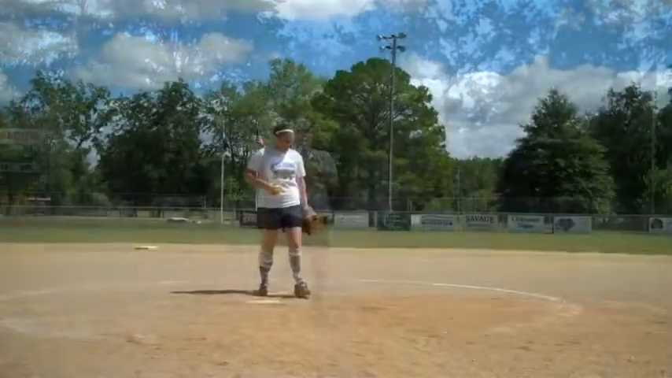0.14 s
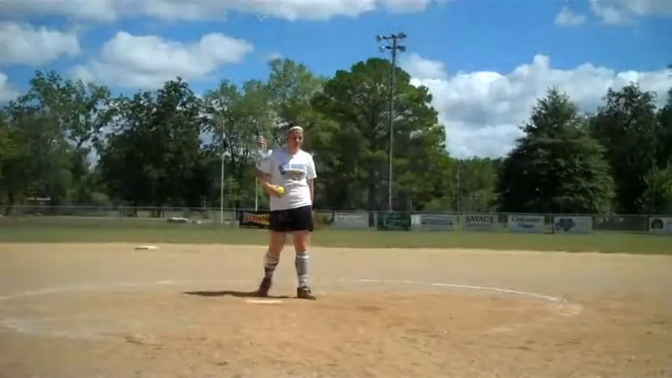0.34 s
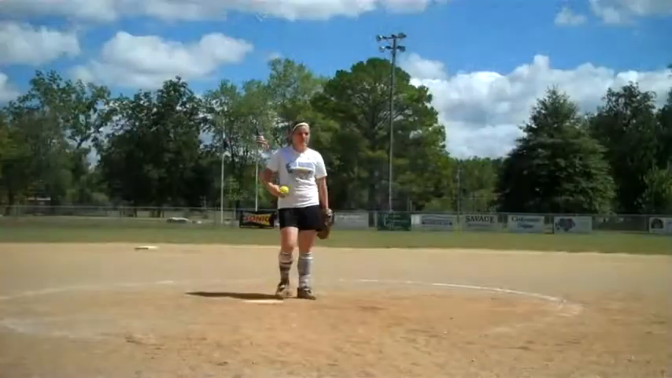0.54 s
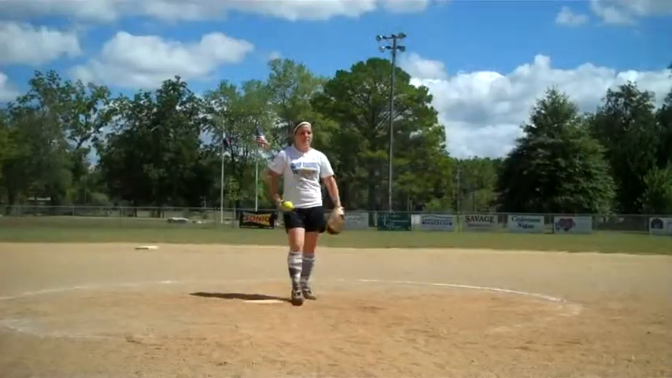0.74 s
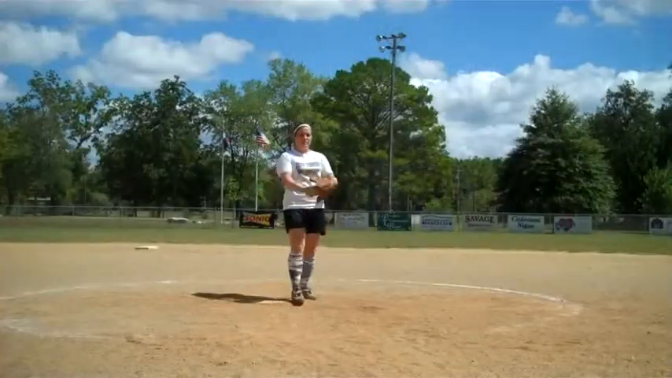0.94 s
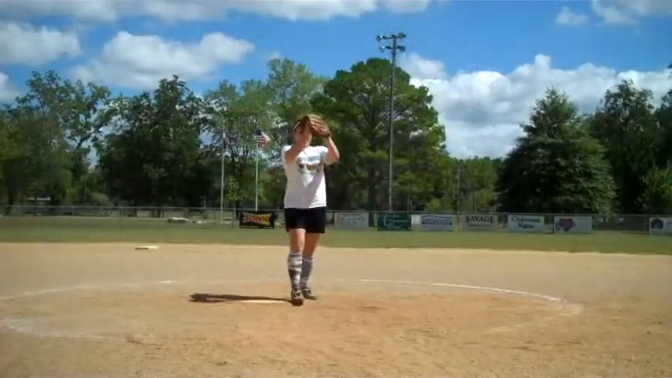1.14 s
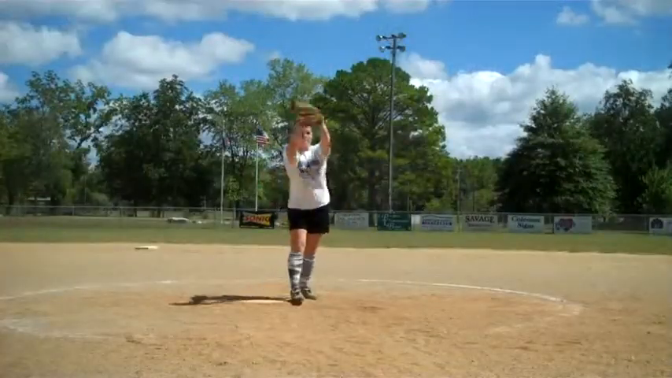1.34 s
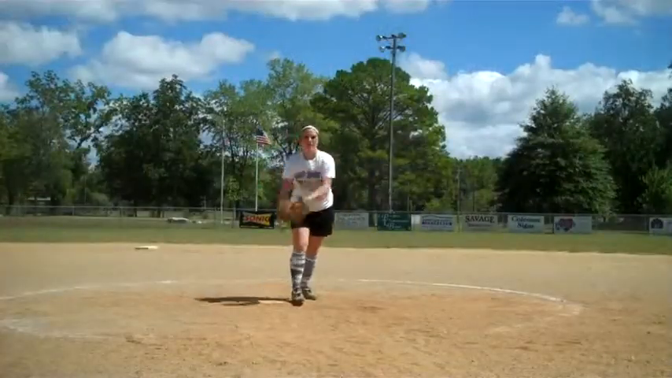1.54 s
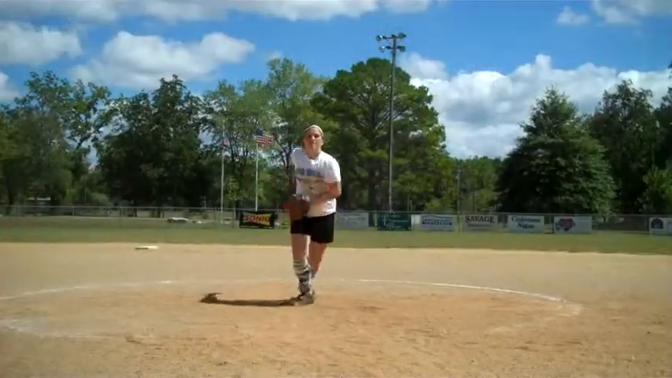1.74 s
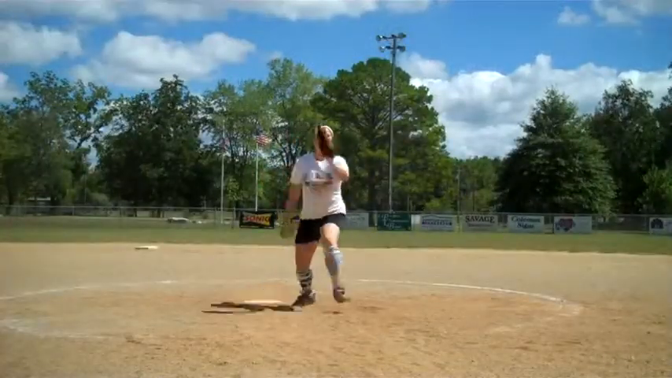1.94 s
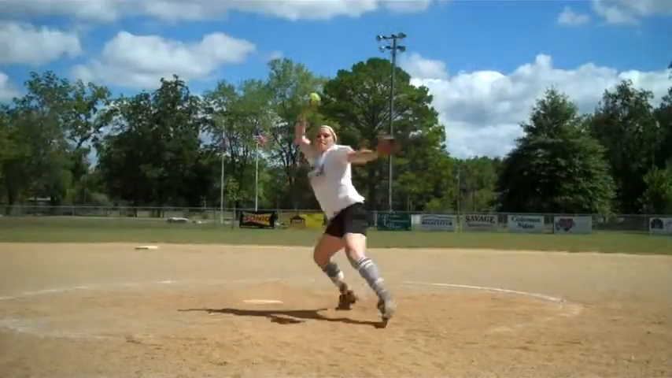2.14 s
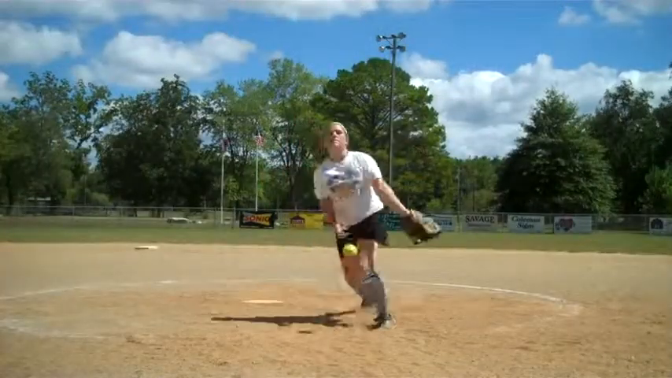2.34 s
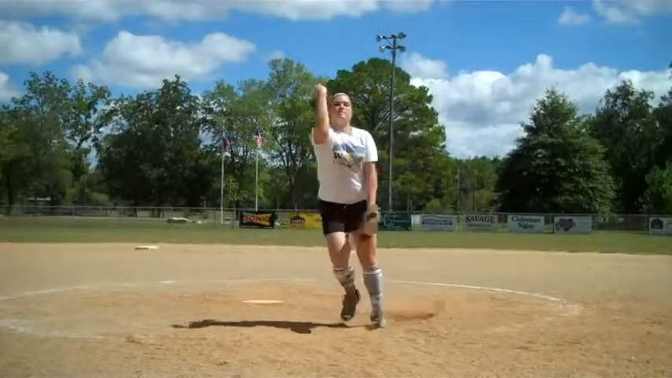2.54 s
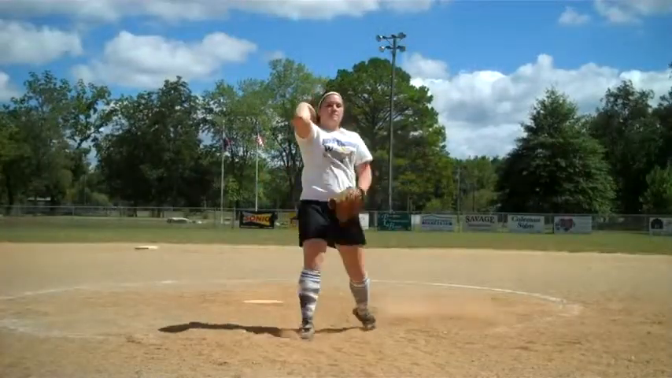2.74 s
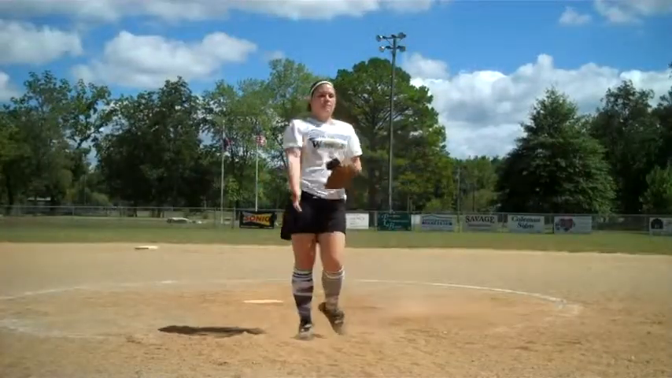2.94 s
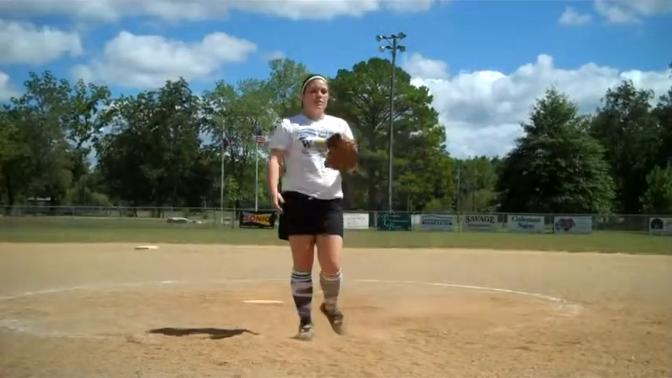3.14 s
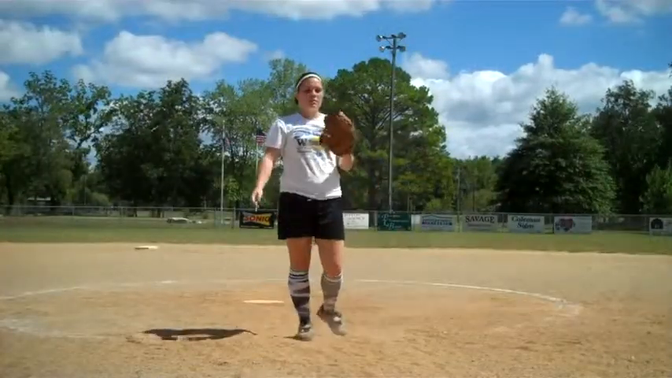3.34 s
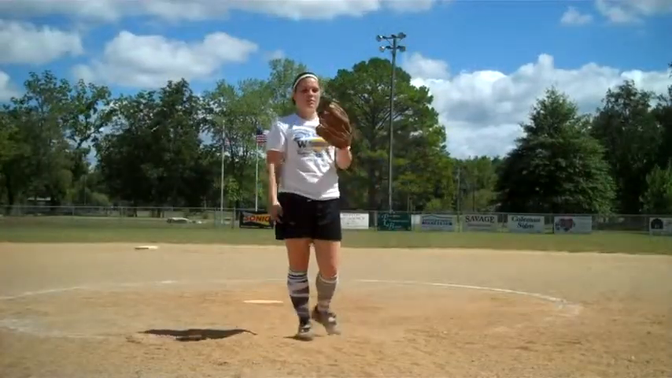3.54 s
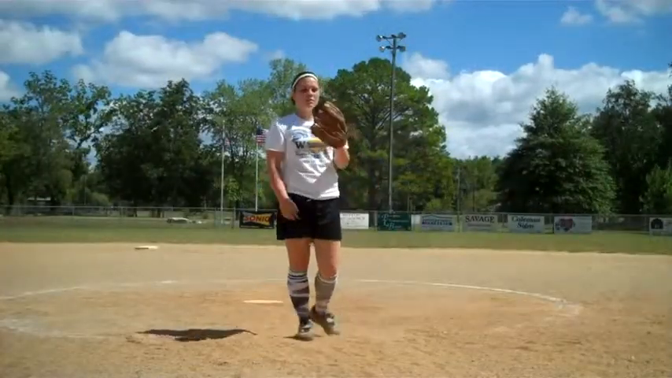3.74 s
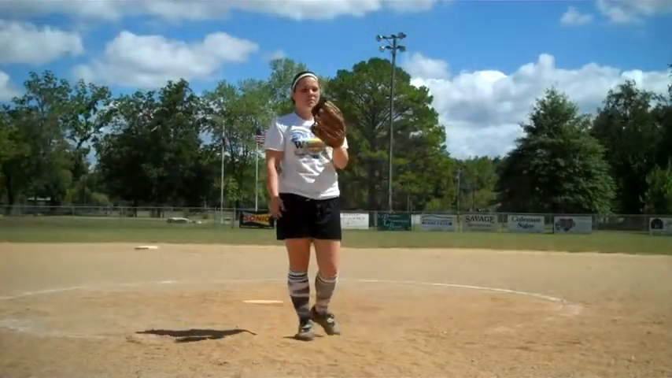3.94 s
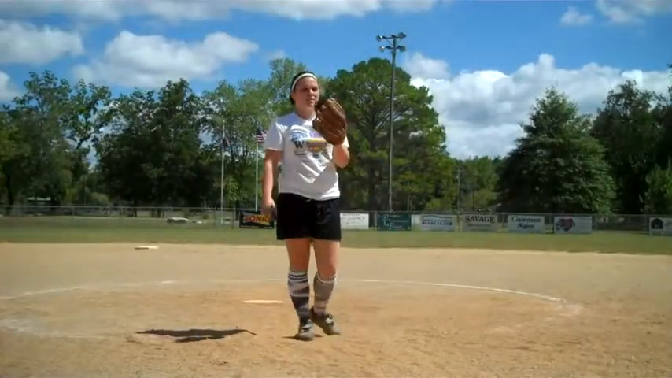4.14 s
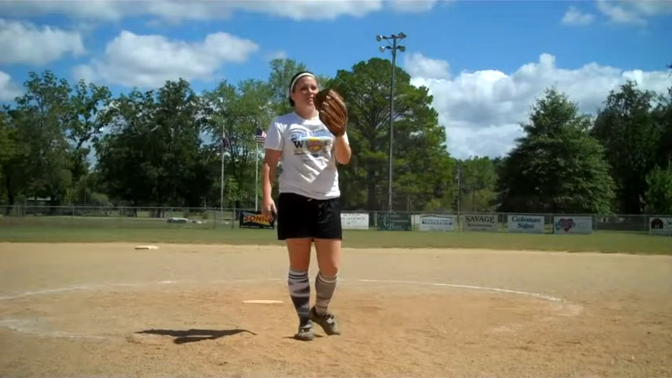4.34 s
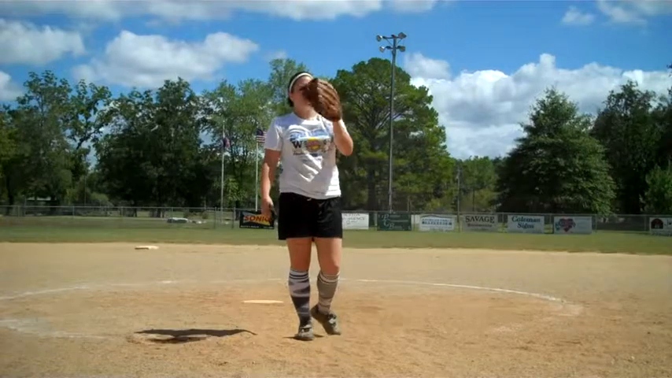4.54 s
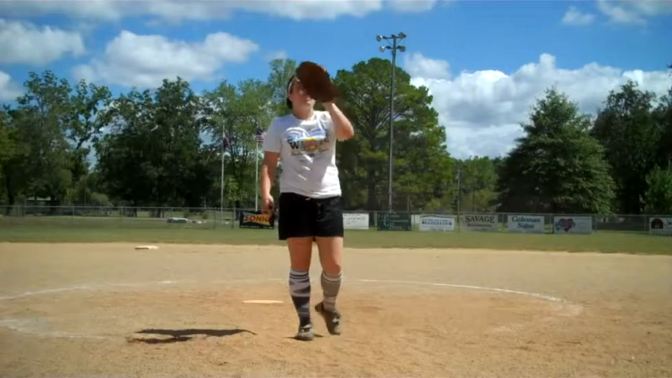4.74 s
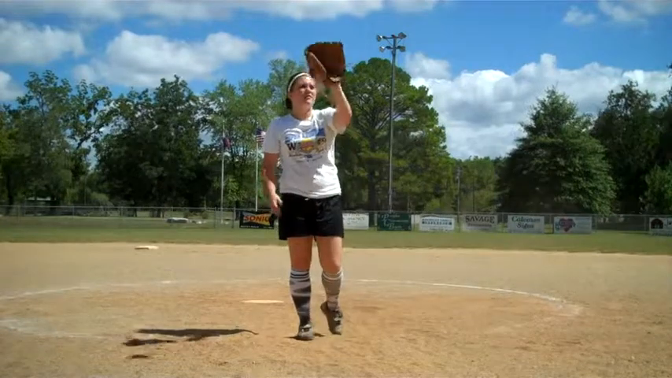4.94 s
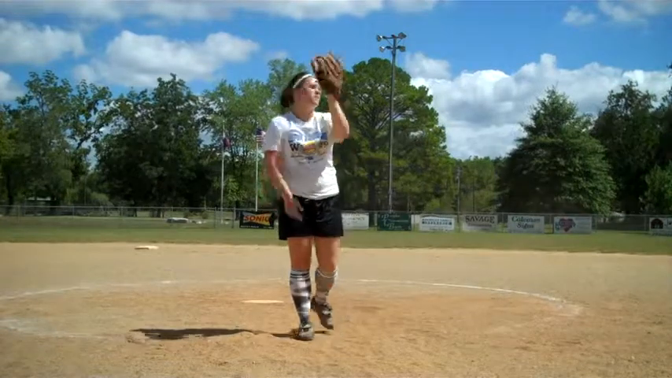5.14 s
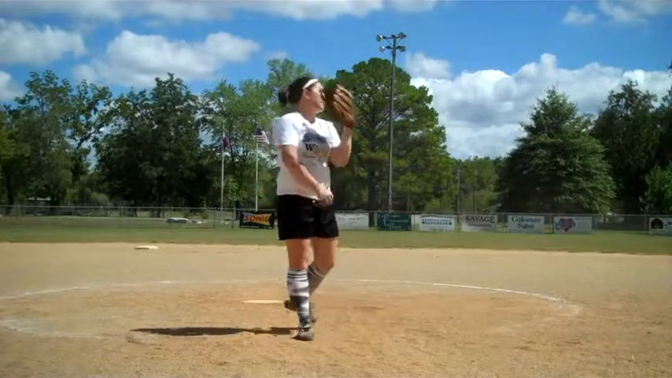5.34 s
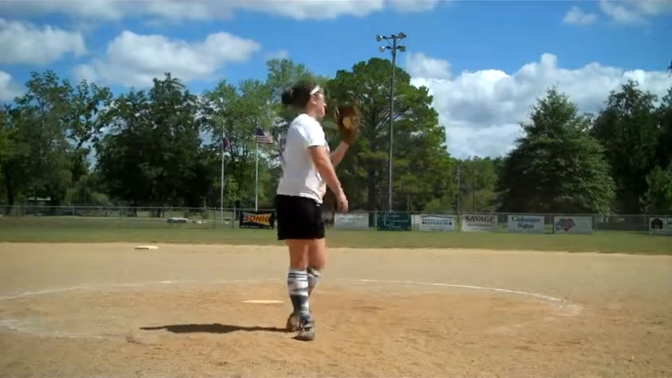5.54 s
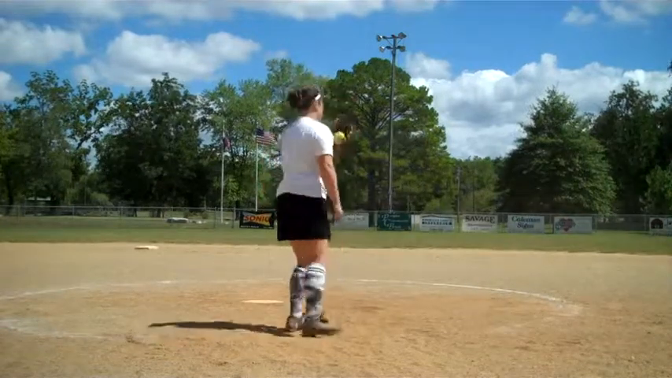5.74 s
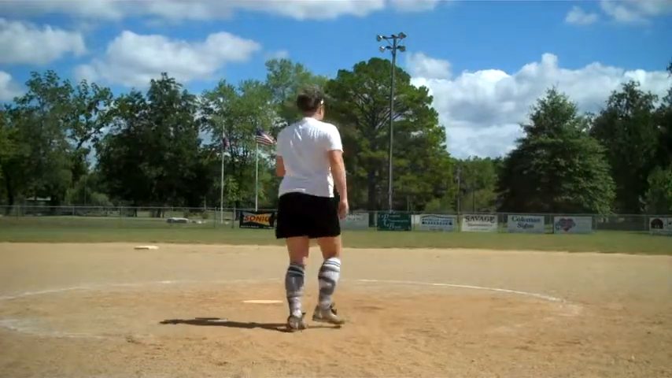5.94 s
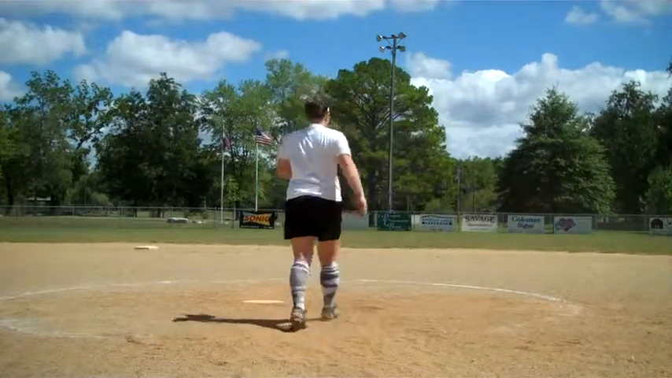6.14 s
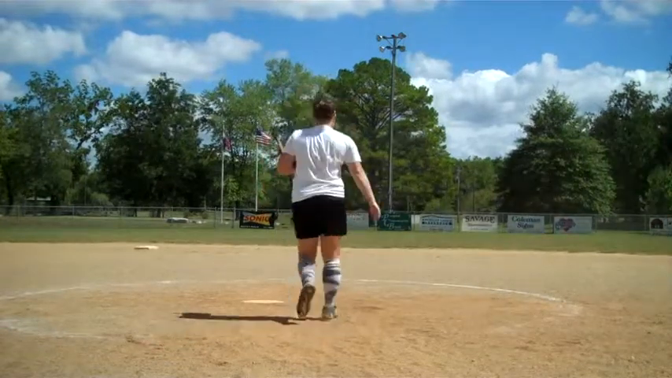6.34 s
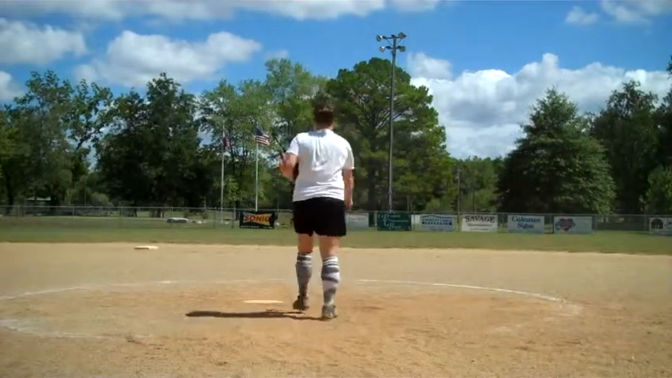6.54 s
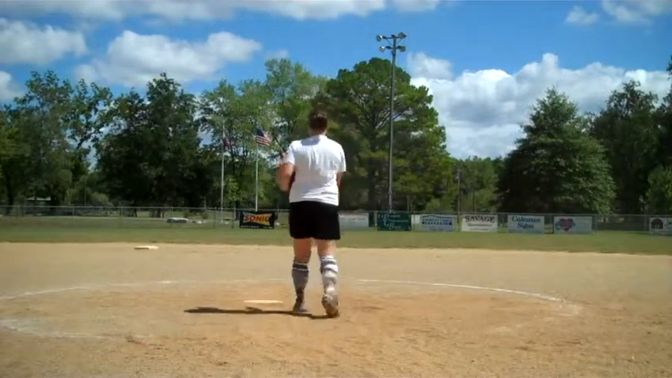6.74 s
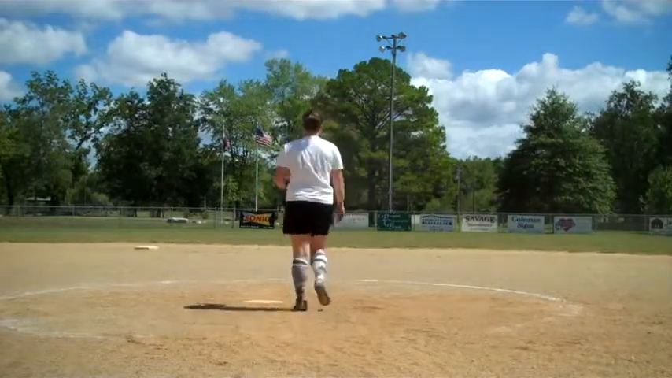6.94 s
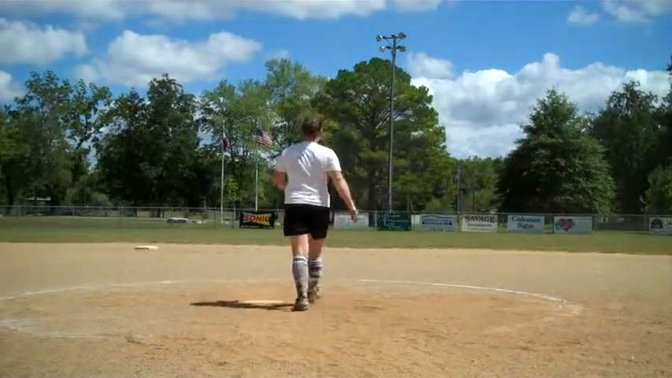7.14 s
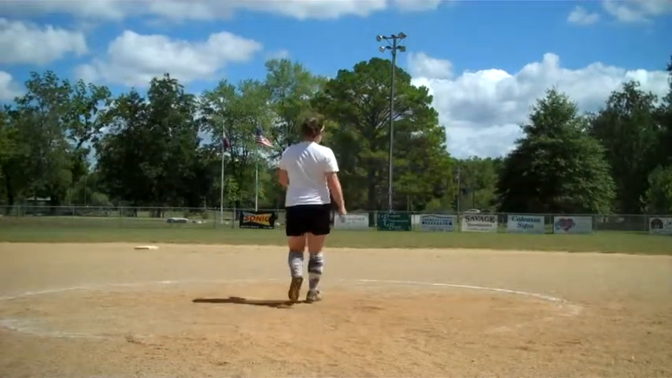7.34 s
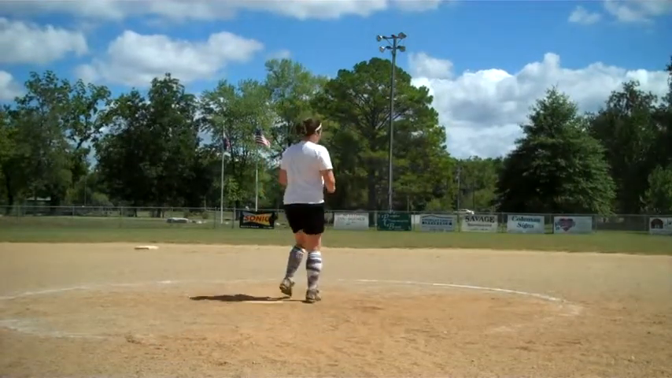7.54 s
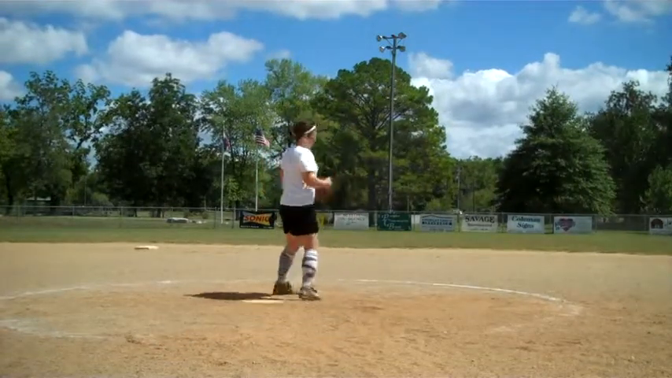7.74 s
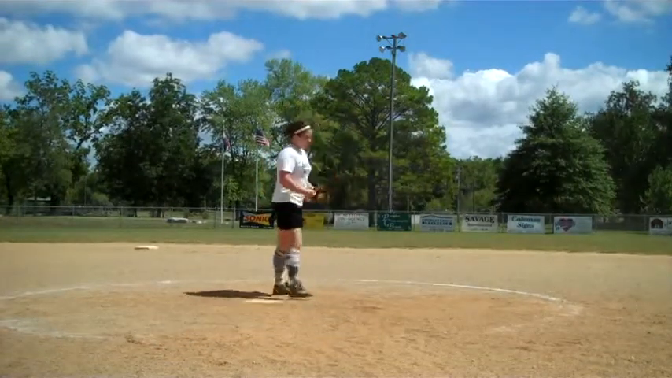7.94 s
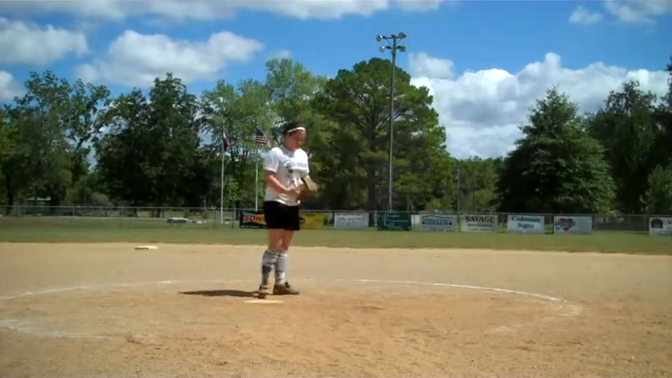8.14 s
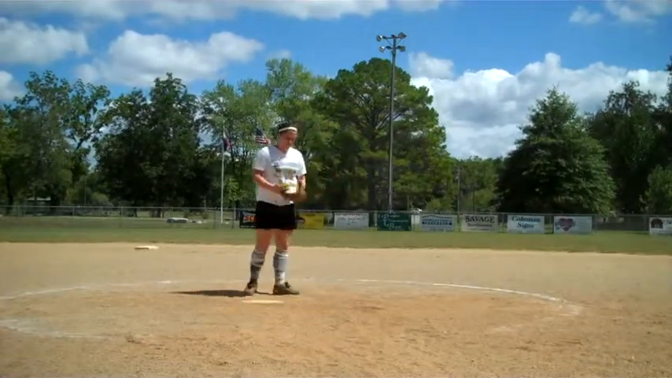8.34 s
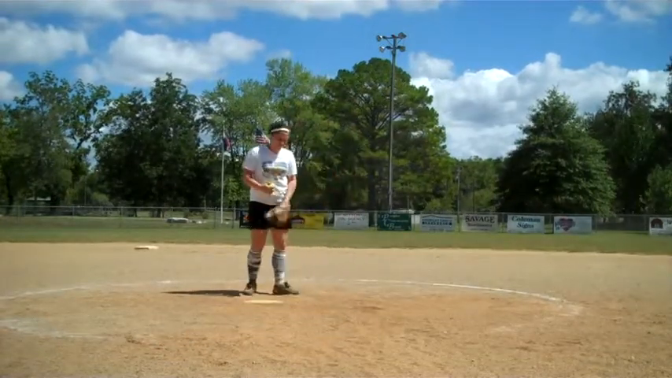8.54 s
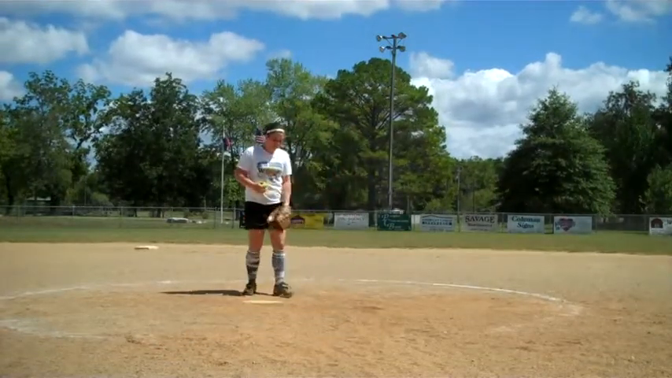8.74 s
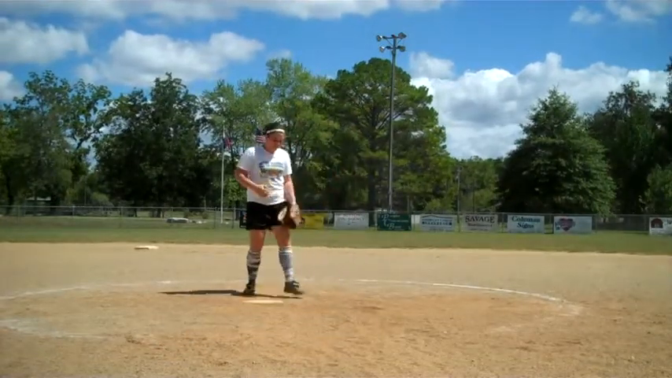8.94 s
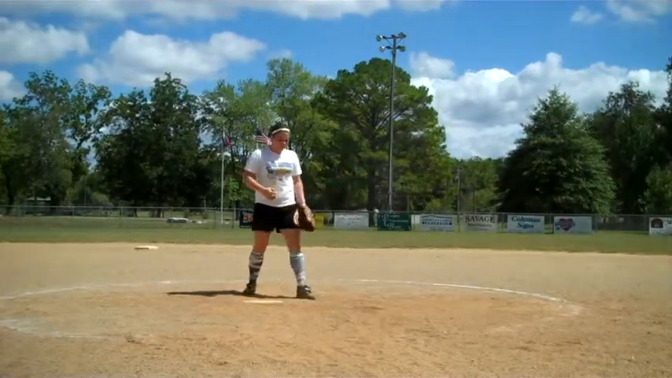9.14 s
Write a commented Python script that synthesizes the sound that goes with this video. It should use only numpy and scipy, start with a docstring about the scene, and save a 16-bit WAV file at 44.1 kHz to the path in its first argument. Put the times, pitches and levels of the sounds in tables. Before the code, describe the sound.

Quiet field ambience, shoes dragging across dirt, one violent leather mitt smack, soft wind thumps, then a smaller crackling glove catch farther away.

```python
"""Softball pitch and return throw

Two spaced microphone ports beside a dirt field. Leaves and distance hiss, a low drone fades, wind thumps on each port:
shaped noise and damped eddies. Small ticks, squeaks, a clink and a rasp are sines and filtered slips. Shoes scuff
with noise strokes; the pitch pops into a mitt close by on the right, a sinking sine with leather cracks and echoes
that overloads the input; the return throw rattles into a far glove as noise bursts."""
import sys
import numpy as np
from scipy.fft import rfft, irfft, next_fast_len
from scipy.io import wavfile
from scipy.ndimage import map_coordinates

SR = 44100
rng = np.random.default_rng(int(sys.argv[2]) if len(sys.argv) > 2 else 0)


def pcm_store(signal):
    """Save signal as 16-bit PCM."""
    levels = np.round(np.clip(np.atleast_2d(signal), -1, 1) * 32767)
    wavfile.write(sys.argv[1], SR, levels.astype(np.int16).T)


N = 409997
TIME = np.arange(N) / SR


def amp(db):
    """Gain of a dB value."""
    return 10 ** (np.asarray(db) / 20)


def unit(x):
    """x at rms 1."""
    return x / np.sqrt(np.mean(x ** 2) + 1e-20)


def along(points, hz):
    """Interpolates (f/Hz, value) points on a log frequency axis."""
    f, v = np.transpose(points)
    return np.interp(np.log(hz + 1), np.log(f + 1), v)


def curves(rows):
    """One value per sample for each column after the time."""
    s, *cols = np.transpose(rows)
    return [np.interp(TIME, s, c) for c in cols]


def wobble(knots_per_s):
    """A smooth random curve."""
    knots = rng.standard_normal(int(N * knots_per_s / SR) + 4)
    return map_coordinates(knots, [TIME * knots_per_s])


def sine(hz, t):
    """Sine of constant pitch."""
    return np.sin(2 * np.pi * hz * t)


def attack(t, rise_s):
    """Exponential onset from 0 towards 1."""
    return 1 - np.exp(-t / rise_s)


def stroke(peak_s, rise_s, fall_s):
    """Pressure that swells to 1 at its peak and eases off."""
    width_s = np.where(TIME < peak_s, rise_s, fall_s)
    return np.exp(-((TIME - peak_s) / width_s) ** 2)


def filtered(x, response):
    """x times a complex response of frequency."""
    m = next_fast_len(x.shape[-1] + 8192)
    hz = np.fft.rfftfreq(m, 1 / SR)
    return irfft(rfft(x, m) * response(hz), m)[..., :x.shape[-1]]


def noise(spectrum, size=N):
    """Coloured noise of rms 1."""
    white = rng.standard_normal(size)
    return unit(filtered(white, lambda hz: amp(along(spectrum, hz))))


# likeness of far sound at the two ports: f/Hz, correlation/1
FAR_LIKENESS = [(200, 1), (700, 0.92), (1300, 0.7), (2400, 0.31), (4000, -0.3)]


def spread(spectrum, likeness=FAR_LIKENESS):
    """Far noise at both ports, rms 1: the mid/side balance sets their correlation at each frequency."""
    def mid_side(hz):
        angle = np.arccos(np.clip(along(likeness, hz), -1, 1)) / 2
        return amp(along(spectrum, hz)) * [np.cos(angle), np.sin(angle)]
    mid, side = filtered(rng.standard_normal((2, N)), mid_side)
    return unit(np.array([mid + side, mid - side]))


def add(track, s, sound):
    """Lays a sound into a track at s seconds."""
    start = round(s * SR)
    track[..., start:start + sound.shape[-1]] += sound


def placed(x, lead_ms, loose):
    """A source that reaches the right port first; part of its treble differs between the ports."""
    def ports(hz):
        delay = np.exp(1j * np.pi * hz * lead_ms / 1000 * np.array([[-1], [1]]))
        differing = 1j * np.array([[1], [-1]]) * np.sin(hz / 310) * hz / (hz + 4000)
        return delay * (1 + loose * differing)
    return filtered(x, ports)


# far rush and leaf hiss: t/s, rush level/dB, hiss level/dB
FIELD_DB = [(0, -47, -48.5), (.36, -43.5, -48.5), (2.1, -43.5, -48.5), (2.55, -43.5, -45.5),
            (3, -44, -48.5), (4.9, -44.5, -50), (6.2, -44.5, -49.5), (6.8, -45.5, -50.5),
            (8.2, -45.5, -49.5), (9.3, -45.5, -49.5)]
# spectra: f/Hz, level/dB per Hz
RUSH_SPECTRUM_DB = [(88, -32), (150, -9), (195, -3.5), (233, -5.5), (262, -6), (389, -6), (605, -7.5),
                    (1070, -2.5), (1260, -4.5), (3040, -8), (5000, -15), (6500, -24.5), (11000, -120)]
HISS_SPECTRUM_DB = [(2500, -40), (4000, -6.5), (5500, -2.5), (7300, 2), (8500, -6), (10000, -17.5),
                    (12000, -22.5), (14100, -20), (14300, -68)]
DRONE_SPECTRUM_DB = [(50, -19), (85, 6), (105, 2), (122, 13), (145, -3), (200, -21), (260, -54)]
# leaf hiss at the two ports: f/Hz, correlation/1
LEAVES_LIKENESS = [(3000, 0.37), (6000, 0.26), (9000, 0.13), (12000, 0.081)]
# drone: t/s, level/dB
DRONE_DB = [(0, -58.5), (2, -58), (3, -63.5), (6, -65.5), (9.3, -62.5)]


def field():
    """Trees and distance: coloured noises with slow random swells, the leaves mostly from the right."""
    rush_db, hiss_db = curves(FIELD_DB)
    drone_db, = curves(DRONE_DB)
    rush = amp(rush_db + 0.52 * wobble(8)) * spread(RUSH_SPECTRUM_DB)
    leaves = placed(spread(HISS_SPECTRUM_DB, LEAVES_LIKENESS), lead_ms=0.099, loose=0)
    hiss = amp(hiss_db + 0.7 * wobble(9)) * leaves
    drone = amp(drone_db + 0.63 * wobble(3.7)) * spread(DRONE_SPECTRUM_DB)
    return rush + hiss + drone


# buffeting: t/s, level/dB
WIND_DB = [(0, -63), (2.1, -63), (2.45, -50.5), (2.8, -64.5), (3.2, -50.5), (3.5, -61), (4, -54.5),
           (4.9, -49.5), (5.3, -45.5), (5.7, -55), (6.4, -59), (6.7, -65.5), (9.3, -64)]
# buffeting spectrum: f/Hz, level/dB per Hz
BUFFET_SPECTRUM_DB = [(15, -30), (40, 0), (90, -0.5), (170, -9.5), (300, -17), (600, -52)]
# wind blows: t/s, level/dB, f/Hz, left minus right/dB
THUMPS = [(3.468, -39, 94, -8), (3.939, -39.5, 67, -16), (4.129, -41, 83, 11), (4.459, -37.5, 52, -14),
          (4.669, -33.5, 94, -21), (4.73, -40, 120, -17.5), (4.965, -37, 71, 24), (5.013, -32.5, 160, 21),
          (5.128, -33, 65, -5), (5.249, -36, 97, 7), (5.49, -38, 171, -8), (5.568, -38, 70, -12)]


def wind():
    """Turbulence at the ports: independent low noise on each, plus short damped eddies."""
    wind_db, = curves(WIND_DB)
    out = np.array([amp(wind_db + 3.7 * wobble(20)) * noise(BUFFET_SPECTRUM_DB) for port in range(2)])
    t = TIME[:SR // 5]
    for s, db, hz, pan_db in THUMPS:
        phase = rng.uniform(0, 2 * np.pi, (2, 1))  # an eddy pushes each port on its own
        puff = t / 0.0073 * np.exp(1 - t / 0.0056) * np.sin(2 * np.pi * hz * t + phase)
        port_db = db + np.array([[pan_db], [-pan_db]]) / 2
        add(out, s - .002, amp(port_db) * puff)
    return out


# small dry ticks: t/s, level/dB (before a gain of 2), f/Hz
TICKS = [(0.591, -33, 4650), (1.7394, -32.5, 6650), (1.766, -38, 7100), (3.86, -37, 7070),
         (4.048, -36, 4950), (8.5503, -30, 7460)]


def ticks():
    """Small dry knocks: sines that die within milliseconds."""
    out, t = np.zeros(N), TIME[:SR // 4]
    for s, db, hz in TICKS:
        add(out, s, amp(db - 60 * t / 0.0033) * 2 * attack(t, 0.000082) * sine(hz, t))
    return out


# t/s, level/dB, first f/Hz, last f/Hz, length/s
SQUEAKS = [(1.862, -34.5, 5200, 8040, 0.008), (6.141, -46, 3440, 5400, 0.0094)]


def squeaks():
    """Rising sine glides of rough loudness, with a weaker partial below."""
    out, t = np.zeros(N), TIME[:SR // 4]
    for s, db, first_hz, last_hz, length_s in SQUEAKS:
        u = np.clip(t / length_s, 0, 1)
        cycles = np.cumsum(first_hz + (last_hz - first_hz) * u) / SR
        tone = sine(1, cycles) + 0.42 * sine(0.577, cycles)
        rough = amp(4 * wobble(1200)[:len(t)])
        add(out, s, amp(db) * np.sin(np.pi * u) ** 0.25 * rough * tone)
    return out


# modes of a small metal part: f/Hz, level/dB (before the clink's gain), t60/s
CLINK_MODES = [(3000, -11, 0.22), (4630, 2, .09), (4820, -12, .25), (6800, -8, .25), (6790, -16, .15),
               (9600, -12, 0.05)]


def clink():
    """A small metal part: decaying modes over a brief knock."""
    out, t = np.zeros(N), TIME[:SR // 4]
    ring = sum(amp(db - 60 * t / t60_s) * sine(hz, t) for hz, db, t60_s in CLINK_MODES)
    knock = 1.7 * sine(4900, t) + 0.75 * sine(5600, t) + 0.55 * sine(3100, t)
    knock *= np.sin(np.pi * np.clip(t / 0.0044, 0, 1))
    add(out, 6.556, amp(-36.5) * (ring * attack(t, .002) + knock))
    return out


# two pulls: peak t/s, level/dB (before SLIP_GAIN_DB), rise/s, fall/s
RASP_PULLS = [(7.963, -39, .024, .006), (7.974, -39, .005, .006)]
# resonances the slips ring: f/Hz, width/Hz, level/dB
RUBBER_MODES = [(1300, 1900, 1), (4320, 2000, 2.5), (7000, 1600, 5)]
SLIP_GAIN_DB = 21
BASE_SLIPS_PER_S, PULL_SLIPS_PER_S, PULL_EXPONENT = 300, 950, 0.22


def rasp():
    """Stick-slip: uneven impulses, denser under pressure, ring a resonant body."""
    def body(hz):
        modes = sum((-1) ** k * amp(db) * 1j * hz * width / (f * f - hz * hz + 1j * hz * width)
                    for k, (f, width, db) in enumerate(RUBBER_MODES))
        return modes / (1 + (hz / 9500) ** 8)
    pull = sum(amp(db) * stroke(s, rise_s, fall_s) for s, db, rise_s, fall_s in RASP_PULLS)
    rate = PULL_SLIPS_PER_S * (pull / pull.max()) ** PULL_EXPONENT + BASE_SLIPS_PER_S
    count = np.floor(np.cumsum(rate * (1 + 0.25 * wobble(400))) / SR)
    slips = np.diff(count, prepend=0) * amp(1.3 * rng.standard_normal(N))
    return pull * filtered(slips, body) * amp(SLIP_GAIN_DB)


# shoe strokes: peak t/s, level/dB, rise/s, fall/s, grit over sole/dB
SCUFFS = [(2.225, -40, 0.011, .012, -7), (2.252, -30, .014, .022, -11), (2.287, -26, 0.016, 0.019, -12.5),
          (2.312, -32, .012, .016, -13), (2.345, -32, 0.018, .014, -12), (2.48, -45, 0.068, 0.025, -4),
          (2.787, -46, .008, 0.021, 3), (2.828, -35.5, 0.014, 0.021, -7.5),
          (2.938, -38.5, .015, 0.025, -17), (3.003, -46, .02, .006, -1), (6.835, -42, 0.022, 0.013, -6),
          (7.76, -47.5, .04, 0.039, -5), (7.85, -55, .03, .04, -12)]
# spectra: f/Hz, level/dB per Hz
SOLE_SPECTRUM_DB = [(88, -52), (150, -16), (305, -5.5), (345, -7), (391, -4), (640, -3.5), (1100, -1),
                    (1470, -8), (2610, -8.5), (6000, -26), (7800, -55), (13200, -120)]
GRIT_SPECTRUM_DB = [(1200, -41), (2500, -8), (4000, -3.5), (5500, -7), (7300, 4), (9000, -11), (13000, -33),
                    (14300, -60)]
# t/s, level/dB, pebble over sole/dB, pebble f/Hz
CRUNCHES = [(2.2488, -30, 2, 7500), (2.278, -28, 2.5, 3220), (2.285, -26, -10, 7000),
            (2.292, -26, -1, 4000), (2.347, -36, -3, 3500), (2.792, -36, 6, 3500), (2.825, -34, -6, 2500),
            (2.921, -32, -6, 2500), (2.932, -29.5, 5, 3200), (2.975, -36, 6, 2800), (6.842, -39, 0, 4000)]
CRUNCH_T60_S = 0.0097


def shoes():
    """Soles drag over dirt: a dull scrape, clumped grit, and single crunches."""
    clumps = amp(1.9 * wobble(300))
    grains = unit(rng.standard_normal(N) * amp(2.3 * wobble(1500)))
    sole = unit(clumps * noise(SOLE_SPECTRUM_DB))
    grit = unit(clumps * filtered(grains, lambda hz: amp(along(GRIT_SPECTRUM_DB, hz))))
    out, t = np.zeros(N), TIME[:SR // 20]
    for s, db, rise_s, fall_s, grit_db in SCUFFS:
        out += amp(db) * stroke(s, rise_s, fall_s) * (sole + amp(grit_db) * grit)
    for s, db, pebble_db, hz in CRUNCHES:
        pebble = noise([(hz / 3.0, -25), (hz, 0), (hz * 1.46, -25), (hz * 3, -60)], size=len(t))
        burst = noise(SOLE_SPECTRUM_DB, size=len(t)) + amp(pebble_db) * pebble
        add(out, s, amp(db - 60 * t / CRUNCH_T60_S) * attack(t, 0.00022) * burst)
    return out


# mitt pocket: t/s, level/dB, first f/Hz, last f/Hz, glide/s, peak after t/s, swell/s
POCKET = (3.0263, 3.5, 800, 330, .0035, .0026, .0011)
# leather cracks: t/s, level/dB, t60/s
CRACKS = [(3.0262, -15, .015), (3.0280, 4, .0055), (3.0318, -25, .012)]
# crack spectrum: f/Hz, level/dB per Hz
LEATHER_SPECTRUM_DB = [(600, -3), (1600, 5), (2500, 4.5), (3600, 3.5), (5300, 0), (7400, -2), (9000, -2),
                       (11000, -30), (16000, -50)]


def mitt_impact():
    """The ball drives the pocket shut: a swelling pop that sinks in pitch, and leather cracks."""
    s, db, first_hz, last_hz, glide_s, peak_s, swell_s = POCKET
    out, t = np.zeros(N), TIME[:SR // 10]
    cycles = last_hz * t + (first_hz - last_hz) * glide_s * attack(t, glide_s)
    force = np.exp(-((t - peak_s) / swell_s) ** 2)
    force += .3 * (t / .002) ** 2 * np.exp(-t / .0017) + .03 * np.exp(-t / .01)
    add(out, s, -amp(db) * force * sine(1, cycles))
    # the stopped ball pushes a puff of air
    add(out, s, -amp(-12.5) * np.exp(-((t - .0035) / 0.00087) ** 2))
    for start_s, crack_db, t60_s in CRACKS:
        crack = attack(t, .0001) * noise(LEATHER_SPECTRUM_DB, size=len(t))
        add(out, start_s, amp(crack_db - 60 * t / t60_s) * crack)
    return out


# fence and stands: delay/s, level/dB, band centre f/Hz
ECHOES = [(0.013, -28, 700), (.029, -29, 5000), (0.061, -35, 1200), (.1165, -28, 3500), (.157, -31, 9000)]
ECHO_SMEAR_T60_S = 0.013


def mitt_echoes(impact):
    """Fence and stands return delayed bands; uneven surfaces smear them by scrambling phase."""
    t = TIME[:SR // 10]
    rough = rng.standard_normal(len(t)) * amp(-60 * t / ECHO_SMEAR_T60_S)

    def response(hz):
        echoes = 0
        for delay_s, db, centre_hz in ECHOES:
            band = 2 * (hz / centre_hz + 0.072) / (1 + (hz / centre_hz) ** 2)
            echoes = echoes + amp(db) * np.exp(-2j * np.pi * hz * delay_s) * band
        return echoes * np.exp(1j * np.angle(rfft(rough, 2 * len(hz) - 1)))
    return filtered(impact, response)


# field scatter spectrum: f/Hz, level/dB per Hz
SCATTER_SPECTRUM_DB = [(150, -32), (350, 5), (600, 3), (1100, 1), (2000, -7), (5000, -29), (9000, -39)]


def mitt_scatter():
    """Diffuse noise tail of the pop: near ground first, then the fence."""
    out, t = np.zeros((2, N)), TIME[:SR // 3]
    ground = amp(-60 * t / 0.061)
    fence = 0.2 * np.exp(-((t - .08) / 0.044) ** 2)
    tail = spread(SCATTER_SPECTRUM_DB)[:, :len(t)] * amp(-28.0) * (ground + fence)
    add(out, POCKET[0] + 0.00446, tail)
    return out


def mitt():
    """The pop at both ports, direct from the right, with its echoes and scatter."""
    impact = mitt_impact()
    direct = placed(impact, lead_ms=0.171, loose=0.99)
    echoes = placed(mitt_echoes(impact), lead_ms=0.018, loose=0.44)
    return direct + echoes + mitt_scatter()


# touches in the far glove: t/s, crackle level/dB, first snap over crackle/dB, slide length/s, thud level/dB
SLAPS = [(5.1443, -19.5, 3, 0.0036, -22.5), (5.1521, -18.5, 17.5, 0.003, -39),
         (5.158, -34, -9, 0.0033, -29), (5.1632, -21, -4, 0.00087, -36), (5.165, -22, -9, 0.0026, -29)]
# spectra of crackle and dull body: f/Hz, level/dB per Hz
GLOVE_SPECTRUM_DB = [(700, -34), (1200, 4), (1600, -2), (2000, -0.5), (2600, -2), (3300, -13), (4700, -1),
                     (5500, -9.5), (7300, 1), (9000, -15), (12000, -32), (16300, -50)]
PADDING_SPECTRUM_DB = [(250, -48), (430, -7), (600, 3), (800, -4), (1100, -18), (2500, -4), (5000, -33)]


def glove():
    """Ball touches palm, web and fingers in turn: sliding leather crackles over a thud."""
    out, t = np.zeros(N), TIME[:SR // 20]
    for s, db, snap_db, length_s, thud_db in SLAPS:
        slide = np.where(t < length_s, 1, amp(-60 * (t - length_s) / 0.0089))
        snap = amp(snap_db - 60 * t / 0.0013)
        crackle = noise(GLOVE_SPECTRUM_DB, size=len(t)) * (slide + snap) * attack(t, .0001)
        thud = noise(PADDING_SPECTRUM_DB, size=len(t)) * (t / 0.0027) * np.exp(1 - t / 0.0027)
        add(out, s, amp(db) * crackle + amp(thud_db) * thud)
    return out


def scene():
    """Everything on the field, at both ports."""
    small = ticks() + squeaks() + clink() + rasp()
    ahead = placed(small + shoes(), lead_ms=0.0089, loose=0.23)
    return field() + wind() + ahead + mitt() + placed(glove(), lead_ms=0.019, loose=0.25)


# port balance: f/Hz, left minus right/dB
TILT_DB = [(100, -1.5), (500, -3), (1500, -1), (8000, 0.5)]
TOP_HZ, TOP_FADE_HZ, LOW_CUT_HZ, CLIP_LEVEL = 16400, 2500, 18, .94


def record(dry):
    """Port balance varies with frequency; the input clips near full scale, then is band-limited."""
    def band(hz):
        return np.clip((TOP_HZ - hz) / TOP_FADE_HZ, 0, 1) * 1j * hz / (LOW_CUT_HZ + 1j * hz)
    ports = filtered(dry, lambda hz: amp(along(TILT_DB, hz) * np.array([[.5], [-.5]])))
    return filtered(np.clip(ports, -CLIP_LEVEL, CLIP_LEVEL), band)


dry = scene()
out = record(dry)
pcm_store(out)
```